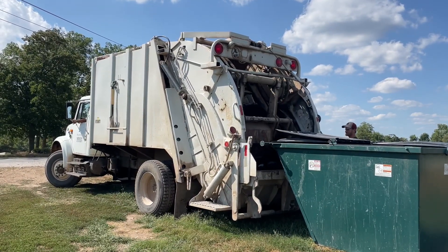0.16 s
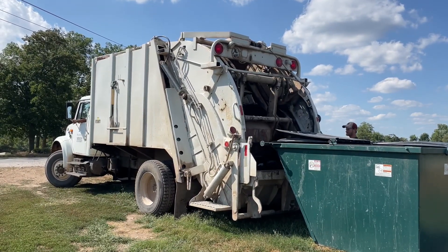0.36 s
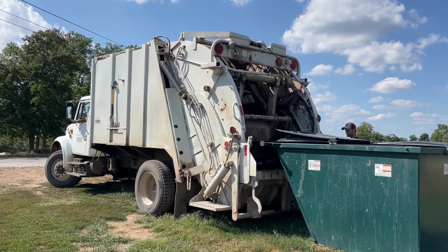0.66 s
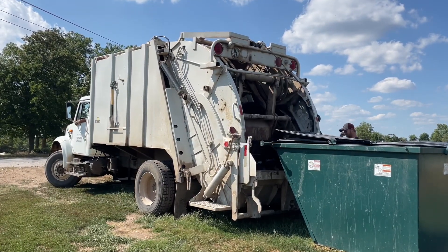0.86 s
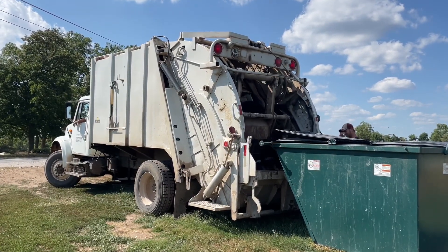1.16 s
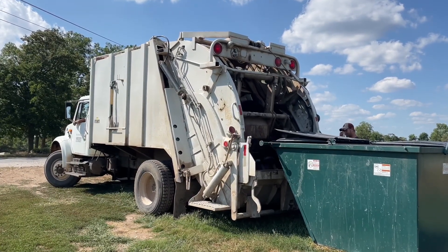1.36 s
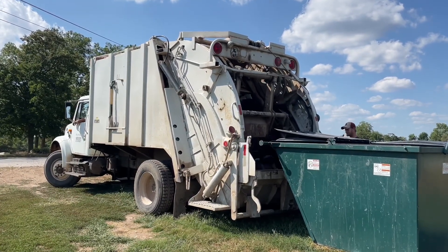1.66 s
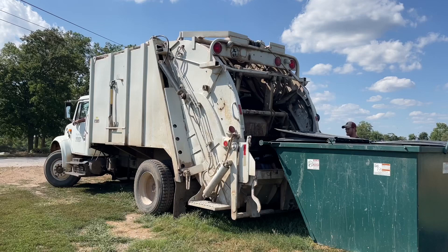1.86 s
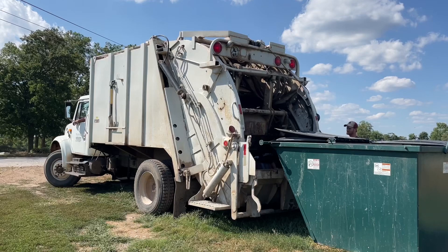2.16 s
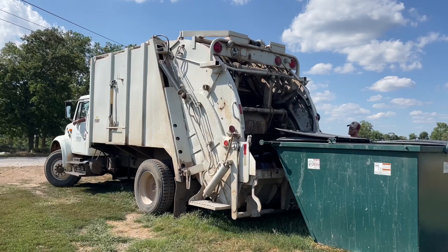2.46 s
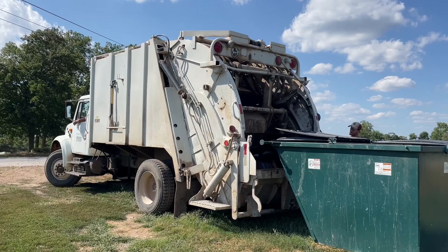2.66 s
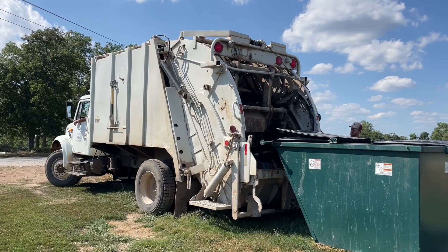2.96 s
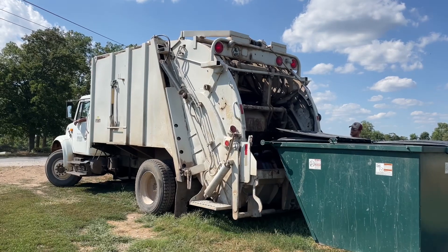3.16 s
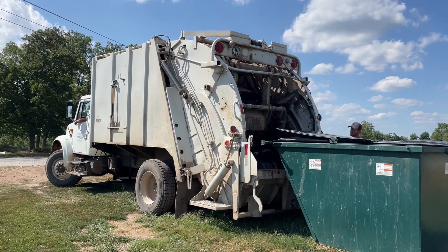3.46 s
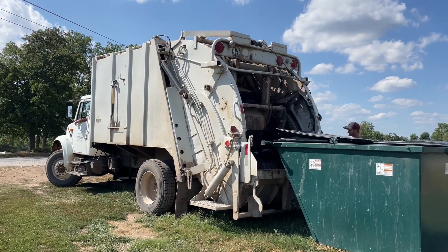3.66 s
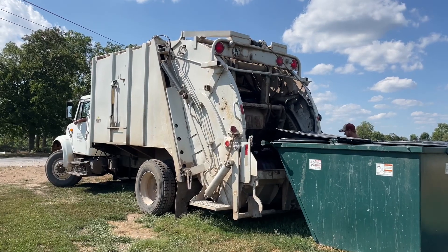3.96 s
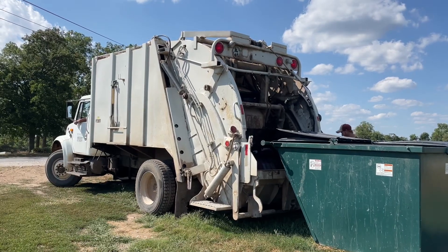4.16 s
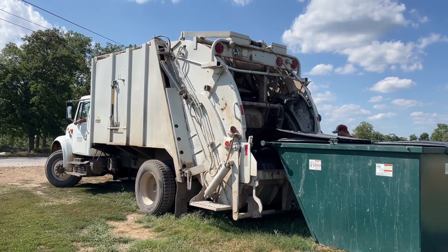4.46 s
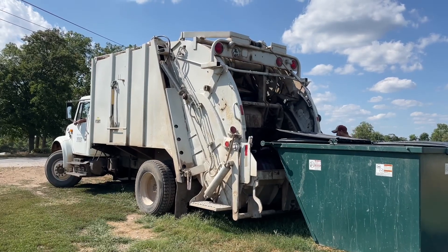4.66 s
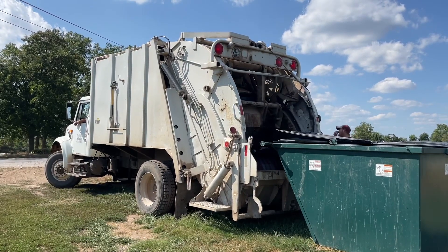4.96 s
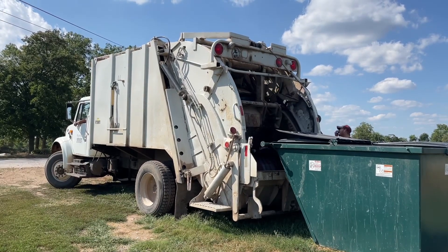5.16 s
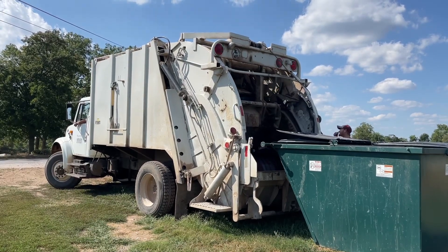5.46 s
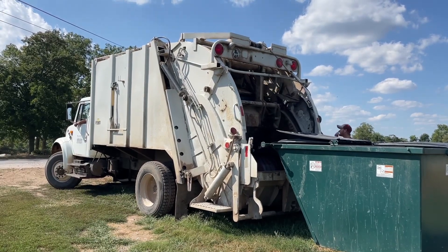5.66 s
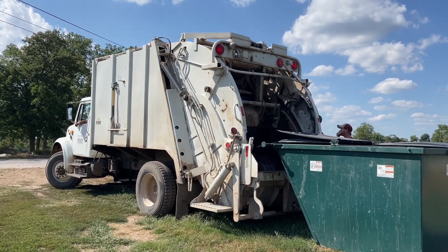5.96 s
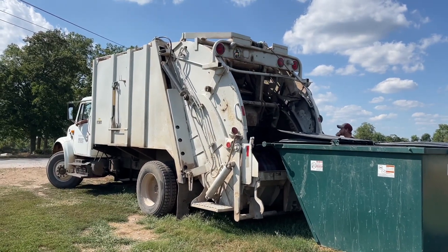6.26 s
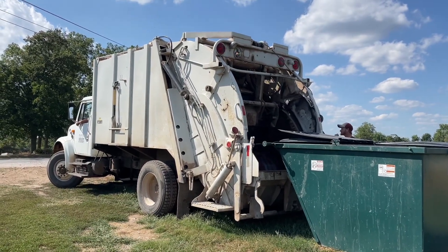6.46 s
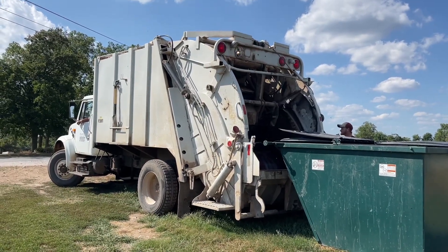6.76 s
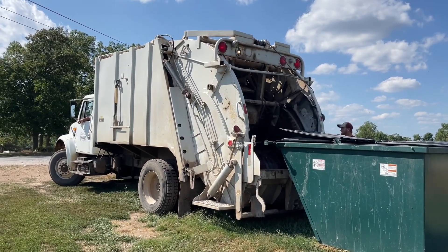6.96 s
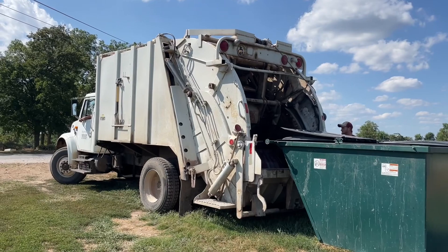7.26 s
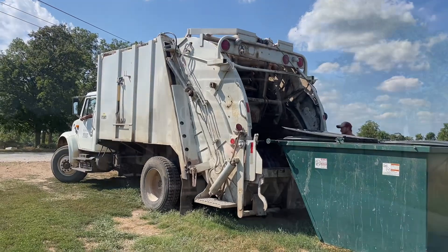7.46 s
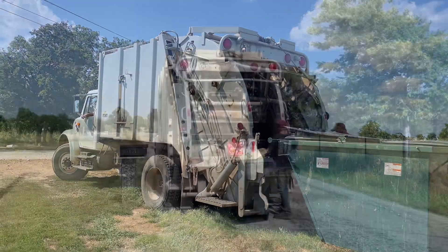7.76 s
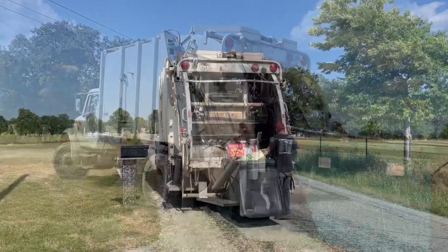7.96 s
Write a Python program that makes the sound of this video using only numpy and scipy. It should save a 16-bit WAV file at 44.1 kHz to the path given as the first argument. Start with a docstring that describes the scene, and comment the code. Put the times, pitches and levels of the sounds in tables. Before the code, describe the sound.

Outdoors near a garbage truck, a diesel at fast, steady idle carries a heavy low hydraulic drone, exhaust rumble, dry mechanical clatter and a thin gear whine around 1500 Hz. Wind buffets the microphone in lumps, with a strong pop at 0.55 s. Small bright snaps and a crunch come near 1.6 s, another snap at 2.4. From 3.4 to 3.9 s trash cracks, scrapes and gives short high squeaks; oil hiss and a gear overtone then slowly rise. At 5.6-5.9 s a dense run of crunches, hollow booms and lower squeaks breaks out and the drone sags. At 6.55 s a very loud hard steel clank hits, with quick rebounds, chatter and a short grind, its ring smothered quickly; the mix ducks and recovers. The engine dips near 6.95 s, then returns. Stronger wind thumps crowd 7.3-7.9 s as the sound begins fading.

```python
"""A rear-loading garbage truck at raised idle: its diesel drives a droning hydraulic pump through whining gears.
Tones follow the shaft; shaped noise makes the clatter, the exhaust rumble and the hiss of oil in the valve.
The packer blade squeaks and crushes trash, dragging the engine down, then hits its stop with a steel clank
built from decaying modes. Noise gusts and falling pops are wind on the microphone.
A limiter ducks after peaks such as the clank, and the sound fades at the end."""
import sys
import numpy as np
from scipy import signal
from scipy.fft import rfft, irfft, next_fast_len
from scipy.io import wavfile
from scipy.ndimage import uniform_filter1d, minimum_filter1d, map_coordinates

SR = 44100
rng = np.random.default_rng(int(sys.argv[2]) if len(sys.argv) > 2 else 0)


def waveform_to_disk(signal):
    """Save audio, clipped to [-1, 1], as 16-bit WAV at the path in sys.argv[1]."""
    frames = np.transpose(np.atleast_2d(signal))
    scaled = np.clip(frames, -1, 1) * 32767
    samples = np.round(scaled).astype(np.int16)
    wavfile.write(sys.argv[1], SR, samples)


N = 357210

# All colour tables give relative density: their noise is scaled to rms 1 before it gets its level.

# speed of the drive, before a slight drift: (time [s], gear mesh pitch [Hz])
MESH_SPEED = [(0.0, 1498), (1.82, 1508), (5.47, 1510), (6.95, 1471), (7.11, 1506), (7.4, 1492),
              (8.05, 1492)]
# level of the pump drone, which sags while the trash gives way: (time [s], level [dB])
PUMP_DRONE = [(5.45, -17.5), (5.72, -22), (5.97, -20), (6.35, -14.5), (6.6, -17.5)]
# sidebands of the gear mesh and high pump and engine orders at idle: (pitch [Hz], level [dB])
WEAKER_WHINES = [(683.7, -46.5), (866.7, -45.5), (936.7, -41), (963.6, -56), (1416, -52), (1669, -46.5),
                 (1739, -44), (1965, -51.5), (2099, -49), (2196, -50.5), (2444, -53), (2509, -46.5),
                 (2740, -48.5), (3246, -49)]
# colour of the engine clatter: (frequency [Hz], density [dB per Hz])
CLATTER_COLOUR = [(300, -30), (520, -5), (700, -5), (950, -2.5), (1500, -4), (1950, -8.5), (2600, -7),
                  (3500, -14), (4600, -19), (5600, -24), (7000, -28.5), (9000, -32.5), (13000, -35.5),
                  (15500, -50)]
# panels and cavities that colour the clatter: (frequency [Hz], width [Hz], gain [dB])
BODY_PANELS = [(606, 170, -1.5), (860, 240, 4.5), (1201, 110, -12), (1400, 700, 1.5), (1890, 69, -3.5),
               (2480, 120, 0), (2890, 110, -7), (3390, 130, -7.5), (4430, 370, 6), (6180, 130, 6.5)]
# colour of exhaust and body rumble: (frequency [Hz], density [dB per Hz])
RUMBLE_COLOUR = [(25, -32), (46, -9), (68, 7), (110, -6.5), (200, -2.5), (280, -12.5), (370, -4.5),
                 (450, -15), (540, -33), (900, -66)]
# strokes of the packer ram:
# (start [s], length [s], pressure build-up [s], oil hiss level [dB], gear overtone level [dB])
RAM_STROKES = [(3.6, 3.22, 2.87, -51.5, -41), (6.882, 1.3, 0.31, -45, -48.5)]
# colour of the oil hiss: (frequency [Hz], density [dB per Hz])
OIL_COLOUR = [(1500, -34.5), (3000, 5), (3600, 1), (4500, -4), (6000, -14), (9000, -3), (11500, -6),
              (15000, -19.5)]
# trash breaking under the blade: (time [s], crack level [dB], hopper boom level [dB], pitch [Hz])
CRUNCHES = [(1.5931, -23.5, -31, 1474), (3.419, -20.5, -34.5, 2400), (3.433, -20.5, -26.5, 2100),
            (3.622, -27, -30, 1600), (5.58, -20.5, -15, 2760), (5.5984, -25.5, -22, 1110),
            (5.7165, -19, -27, 2000), (5.791, -20.5, -20, 1735), (5.801, -17, -18.5, 1505),
            (5.808, -14.5, -18.5, 3420), (5.827, -22.5, -24, 1900), (5.895, -21, -17.5, 1634)]
# colour of splintering trash: (frequency [Hz], density [dB per Hz])
SPLINTER_COLOUR = [(700, -15), (1400, 7.5), (2400, 2), (3500, 3.5), (5000, -11.5), (7000, -12.5),
                   (15000, -31.5)]
# colour of the hopper boom: (frequency [Hz], density [dB per Hz])
HOPPER_COLOUR = [(150, -25.5), (330, 12.5), (450, 9.5), (650, -7), (1000, 4), (1300, -26), (2500, -63.5)]
# trash dragged over the hopper floor: (start [s], length [s], level [dB])
FLOOR_DRAGS = [(3.42, 0.04, -31.5), (3.577, 0.17, -31), (3.725, 0.025, -33), (5.558, 0.4, -32.5),
               (6.845, 0.088, -28)]
# colour of the scrape: (frequency [Hz], density [dB per Hz])
SCRAPE_COLOUR = [(200, -12.5), (380, 6.5), (600, -0.5), (850, 10.5), (1150, -2.5), (1550, 3), (2300, -7),
                 (4000, -23.5), (15000, -48)]
# the clearest small bright snaps: (time [s], level [dB])
CLEAR_SNAPS = [(1.5772, -32.5), (1.598, -29.5), (1.7505, -37), (1.779, -35), (2.0038, -34.5), (2.127, -35),
               (2.41, -27), (3.141, -35), (3.29, -36), (3.426, -27), (4.667, -27.5), (4.7405, -32),
               (4.76, -37), (5.812, -32.5), (6.2626, -25.5), (6.4572, -33.5), (6.708, -24.5)]
# colour of the snaps: (frequency [Hz], density [dB per Hz])
SNAP_COLOUR = [(700, -2.5), (1500, 7), (3500, 10), (6500, 0), (11000, 0), (15000, -9)]
# rubbing squeaks: (time [s], length [s], pitch [Hz], level [dB], roughness [0-1])
RUBBING_SQUEAKS = [(3.33, 0.017, 3340, -30, 0.4), (3.689, 0.023, 3600, -24, 0.4),
                   (3.711, 0.025, 3630, -24, 0.1), (3.733, 0.027, 3510, -22, .15),
                   (3.736, 0.015, 5050, -32.5, .3), (3.749, 0.051, 3490, -34.5, 0.5),
                   (3.917, 0.037, 3510, -26, 0.7), (4.556, 0.02, 4100, -31.5, 1),
                   (5.63, 0.022, 1366, -24, .4), (5.717, 0.016, 974, -11.5, .1),
                   (5.715, 0.015, 1370, -16, 0), (5.739, 0.022, 1000, -25, .7),
                   (5.768, 0.024, 1015, -16, .2)]
# the blade's hit and rebounds:
# (time [s], ring level [dB], crack level [dB], frequency that the contact wakes most [Hz])
BLADE_HITS = [(6.552, 0, -1.5, 2390), (6.627, -14.5, -33, 1000), (6.666, -17, -21.5, 2900),
              (6.7, -24, -17.5, 4200)]
# ringing modes of the blade's stop: (frequency [Hz], level [dB], 60 dB decay [s])
STOP_MODES = [(1255, -15, 0.28), (1365, -7.5, 0.33), (1625, 4, 0.12), (1650, -9, 0.28), (2244, -4, 0.28),
              (2696, -11.5, 0.15), (2970, -12.5, 0.064), (3244, -3, 0.075), (3420, -7.5, 0.11),
              (3590, -13, 0.25), (4200, -8, 0.11), (4590, 1, 0.038), (4780, -8.5, 0.11)]
# colour of the hard crack: (frequency [Hz], density [dB per Hz])
CRACK_COLOUR = [(500, -9), (1000, -9.5), (1400, -1.5), (2500, -8), (4200, -9.5), (5500, -14), (8000, -12.5),
                (10500, -17), (15000, -33.5)]
# the blade grinds into its seat and pulls free again: (start [s], length [s], level [dB])
SEAT_GRINDS = [(6.698, 0.019, -22), (6.848, 0.087, -28)]
# gusts on the microphone: (start [s], length [s], buffet level [dB])
WIND_GUSTS = [(-0.1, 0.17, -24), (0.33, 0.33, -22.5), (1.4, 0.86, -28.5), (2.05, 1.13, -22.5),
              (3.1, 0.54, -20), (4.4, 1, -24.5), (5.52, 0.98, -17), (6.83, 0.17, -12.5), (7.28, 0.41, -13),
              (7.75, 0.74, -13)]
# colour of the buffeting: (frequency [Hz], density [dB per Hz])
BUFFET_COLOUR = [(20, -35), (35, -13), (55, 0), (100, -2.5), (180, -8), (350, -16), (550, -30.5),
                 (1000, -37), (3000, -95)]
# big eddies that pop on the microphone: (time [s], peak level [dB], middle pitch [Hz])
BIG_THUMPS = [(0.5529, -4, 404), (2.256, -10.5, 128), (3.208, -11.5, 338), (3.457, -13, 326),
              (3.554, -9.5, 288), (3.593, -7, 212), (5.179, -11, 275), (5.69, -9.5, 242), (5.864, -10, 300),
              (6.038, -16.5, 367), (6.082, -19, 380), (6.199, -5.5, 151), (6.227, -9.5, 292),
              (6.384, -8.5, 310), (6.438, -13, 454), (6.486, -12, 171), (6.955, -8, 232), (7.417, -9, 152),
              (7.461, -11, 290), (7.501, -7, 297), (7.625, -5, 310), (7.639, -8, 670), (7.676, -14, 202),
              (7.879, -11, 273)]
# tonal tilt between the channels: (frequency [Hz], left minus right [dB])
STEREO_LEAN = [(60, -1.5), (110, 1), (200, -1.5), (380, 0), (700, 4), (1300, -0.2), (2400, -0.6),
               (8000, -0.5)]
# lead of the left channel for a source at the truck's side: (frequency [Hz], phase [radians])
STEREO_LEAD = [(60, 0.35), (300, 0.41), (900, 0.86), (1100, 1.95), (1300, 0.79), (1500, 0.41), (1800, 1.6),
               (2100, 1.22), (3150, 2.56), (4200, 1.73), (5000, 0.76)]
# phase of left against right that the microphone pair adds in the treble: (frequency [Hz], phase [radians])
TREBLE_TWIST = [(5000, 0), (5800, -1.6), (6500, -.7), (7700, -3.4), (9200, -3.8), (12500, -6.7)]
# gain of the scattered sound: (frequency [Hz], scattered minus direct [dB])
SCATTER = [(60, -15), (220, -20.5), (600, -10), (1500, -29.5), (2500, -5.5), (3700, -6), (5300, -10.5),
           (6200, -2), (8500, -26), (11000, -18), (12800, -27.5)]

GEAR_TEETH, PUMP_RATIO, FAN_RATIO, IDLE_MESH_HZ = 68, 6.614, 8.09, 1508.3
FIRING_DB, FAN_DB, MESH_DB, CLATTER_DB, RUMBLE_DB = -19.5, -32.5, -35, -32, -25.5
# change at full pressure; for the whine, per octave above the knee
LOADED_CLATTER_DB, LOADED_WHINE_DB, WHINE_KNEE_HZ = -1, -11, 1000
VENT_S, HISS_POWER = 0.14, 3.6  # the pressure falls in this time; hiss grows as this power of it
IDLE_HISS_DB, IDLE_OVERTONE_DB = -68.5, -63.5
CRUNCH_T60_S, BOOM_T60_S = 0.087, 0.24
CRUNCH_RISE_S, HARD_CRUNCH_DB = 0.0011, -16  # rise time of a crack at this level
WALL_RING_DB, WALL_T60_S = -16, 0.13  # each mode of the hopper wall, relative to the crack that wakes it
DRAG_RISE_S, DRAG_FALL_S, CRUMPLE_DB = 0.025, 0.09, -9.5  # crumpling is relative to the drag
# loose scrap; its level is relative to the drag, its ticks to the knock
RATTLES_PER_S, RATTLE_DB, RATTLE_HZ, RATTLE_T60_S, RATTLE_TICK_DB = 70, 3.5, 1253, 0.06, -11.5
SNAP_T60_S, FAINT_SNAPS_PER_S, FAINT_SNAP_DB = 0.049, 14, -44.5
SNAP_TAIL_DB, SNAP_TAIL_T60_S = -15.5, 0.44  # the bits settle after each clear snap; relative to it
SQUEAK_WIDTH = 0.033  # half width of a rough slip's band, as a share of its pitch
CONTACT_DB_PER_OCTAVE = 5.5  # modes away from a contact's own pitch are woken less
PLATE_DB, PLATE_T60_S = -16.5, 0.12  # the crowd of short plate modes, relative to the crack colour
SEATED_S, SEATING_S, SEATED_DB = 6.672, 0.03, 8  # when the blade seats, how long it takes, its damping
CHATTER_HZ, CHATTER_DB = 66, 3  # rate and depth of the blade's chatter
BUZZ_DB, BUZZ_PER_S = 1.5, 260  # loose parts touch the ringing steel and roughen it
GRIND_RISE_S, GRIND_FALL_S = 0.011, 0.033
GUST_RISE_S, GUST_FALL_S, CALM_DB = 0.12, 0.15, -37.5
THUMP_CYCLES, THUMP_SAG = 3.26, 5.94  # length of a pop; its first pitch over its last
SMALL_THUMPS_PER_S, SMALL_THUMP_DB, SMALL_THUMP_HZ = 28, -3.5, 329  # strongest, relative to the gust
CEILING, TOP_HZ = .9, 15700  # limiter ceiling [full scale]; upper band edge
FADE_START_S, FADE_DB_PER_S = 7.38, 9


def drive():
    """A six-cylinder diesel fires three times a turn; gears, pump and fan follow its shaft."""
    mesh = np.cumsum(curves(MESH_SPEED)[0] * (1 + 0.00031 * wobble(8))) / SR  # cycles so far
    firing = mesh * 3 / GEAR_TEETH
    pump = mesh / PUMP_RATIO
    fan = mesh / FAN_RATIO

    def tone(cycles, db, waver_db):
        """Sine of a given rms level that wavers slowly."""
        level = amp(db + waver_db * wobble(9))
        return np.sqrt(2) * level * np.sin(2 * np.pi * (cycles + rng.random()))

    hum = tone(firing, FIRING_DB, 0.27) + tone(fan, FAN_DB, 2.3)
    hum += tone(pump, curves(PUMP_DRONE)[0], 0.094) + tone(2 * pump, -48.5, 1.1)

    # oil pressure holds the gear teeth together: they rattle less and their overtone comes out
    pressure = sum(swell(s, length, build, VENT_S) for s, length, build, _, _ in RAM_STROKES)
    strain = sum(amp(db) * swell(s, length, build, VENT_S) for s, length, build, _, db in RAM_STROKES)

    # the strongest whine is steady, the weaker ones waver in the moving air
    whine = tone(mesh, MESH_DB, 0.65)
    whine += (amp(IDLE_OVERTONE_DB) + strain) * tone(2 * mesh, 0, 1.9)
    for hz, db in WEAKER_WHINES:
        octaves_above = max(np.log2(hz / WHINE_KNEE_HZ), 0)
        whine += tone(mesh * hz / IDLE_MESH_HZ, db + LOADED_WHINE_DB * pressure * octaves_above, 2.8)

    # part of the clatter repeats with every engine cycle, the rest is always new
    cycle = firing / 6
    pattern = rng.standard_normal(4096)
    repeating = unit(map_coordinates(pattern, [cycle % 1 * len(pattern)], mode="grid-wrap"))
    knocking = rng.standard_normal((2, N)) + 0.5 * np.array([repeating, np.roll(repeating, SR // 2)])
    pulse_db = .5 * np.cos(2 * np.pi * firing) + .5 * np.cos(4 * np.pi * firing)
    pulse_db += 0.64 * np.cos(2 * np.pi * pump) + wobble(8.0) / 2

    def body(hz):
        """Response of the clatter through panels and cavities."""
        panels = sum(db * np.exp(-2 * ((hz - f) / width) ** 2) for f, width, db in BODY_PANELS)
        return amp(along(CLATTER_COLOUR, hz) + panels)

    clatter = amp(CLATTER_DB + LOADED_CLATTER_DB * pressure) * unit(filtered(knocking * amp(pulse_db), body))
    engine_noise = clatter + amp(RUMBLE_DB) * noise(RUMBLE_COLOUR)
    return placed(hum + whine + engine_noise[0], engine_noise[1], bearing=0.91)


def oil():
    """Oil hisses through the control valve as the pressure of each stroke rises."""
    flow = sum(amp(db) * swell(s, length, build, VENT_S) ** HISS_POWER
               for s, length, build, db, _ in RAM_STROKES)
    hiss = (amp(IDLE_HISS_DB) + flow) * amp(3.7 * wobble(37)) * noise(OIL_COLOUR)
    return placed(*hiss, bearing=0.96)


def clank():
    """The blade hits its stop with a hard crack and a ring, then chatters and grinds into its seat."""
    ring, t = np.zeros((2, N)), np.arange(N) / SR
    plate = [(hz, along(CRACK_COLOUR, hz) + PLATE_DB, PLATE_T60_S)
             for hz in rng.uniform(1200, 12000, size=36)]
    for s, db, crack_db, centre in BLADE_HITS:
        # every contact lands on another spot and wakes its own part of the modes
        modes = [(hz, level - CONTACT_DB_PER_OCTAVE * abs(np.log2(hz / centre)), t60)
                 for hz, level, t60 in STOP_MODES]
        add(ring, s, amp(db) * ringing(modes, attack=0.0032))
        add(ring, s, amp(crack_db) * ringing(plate, attack=0.001))
    blows = bursts([(s, db) for s, _, db, _ in BLADE_HITS], attack=0.0028, t60=0.086)
    crack = blows * np.tanh(noise(CRACK_COLOUR) / 2) * 2  # softly clipped

    # after the rebound the blade chatters against the stop and chops the ring
    rebounded = t > BLADE_HITS[1][0]
    chatter = amp(CHATTER_DB * rebounded * np.cos(2 * np.pi * CHATTER_HZ * t + wobble(40) / 2))
    # once the blade is seated it presses on the steel and smothers the ring
    seated = amp(-SEATED_DB * np.clip((t - SEATED_S) / SEATING_S, 0, 1))
    buzz = unit(amp(BUZZ_DB * wobble(BUZZ_PER_S)))

    grit = unit(amp(2.5 * wobble(300) + 2.6 * wobble(70)) * noise(CRACK_COLOUR))
    grind = swells(SEAT_GRINDS, GRIND_RISE_S, GRIND_FALL_S) * grit
    return placed(*(ring * buzz * chatter * seated + crack + grind), bearing=0.1)


def trash():
    """Trash scrapes and rattles along, breaks and booms in the hopper; small bits snap, faint ones at random."""
    grain = unit(amp(1.2 * wobble(450)))
    boom = bursts([(s, db) for s, _, db, _ in CRUNCHES], attack=0.0017, t60=BOOM_T60_S) * noise(HOPPER_COLOUR)

    rubbing = amp(5.6 * wobble(60)) * grain * noise(SCRAPE_COLOUR)
    crumpling = amp(CRUMPLE_DB) * unit(amp(6.7 * wobble(250)) * noise(SPLINTER_COLOUR))
    scrape = swells(FLOOR_DRAGS, DRAG_RISE_S, DRAG_FALL_S) * (rubbing + crumpling)

    chances = rng.random((256, 2))[:int(FAINT_SNAPS_PER_S * N / SR)]
    faint = [(when * N / SR, FAINT_SNAP_DB - 6 * weak) for when, weak in chances]
    knocks = jostles()
    ticks = [(s, db + RATTLE_TICK_DB) for s, db, _ in knocks]
    snapping = bursts(list(CLEAR_SNAPS) + faint + ticks, attack=0.00036, t60=SNAP_T60_S)
    settling = amp(SNAP_TAIL_DB) * bursts(CLEAR_SNAPS, attack=SNAP_T60_S / 10, t60=SNAP_TAIL_T60_S)
    snaps = (snapping + settling) * grain * noise(SNAP_COLOUR)
    return placed(*(crunches() + boom + scrape + rattle(knocks) + snaps), bearing=0.7)


def crunches():
    """Every piece that breaks crackles at its own pitch and rings its own patch of the steel hopper wall."""
    track, t = np.zeros((2, N)), np.arange(SR // 3) / SR
    for s, db, _, pitch in CRUNCHES:
        knots = np.arange(0, SR / 2, 170)
        ripple_db = 4 * rng.standard_normal(len(knots))

        def colour(hz):
            """Splinter colour with a random ripple and a peak at the piece's pitch."""
            peak_db = 5 * np.exp(-(3 * np.log((hz + 1) / pitch)) ** 2)
            return amp(along(SPLINTER_COLOUR, hz) + np.interp(hz, knots, ripple_db) + peak_db)

        grains = rng.standard_normal((2, len(t))) * amp(1.2 * wobble(620, size=len(t)))
        rise = CRUNCH_RISE_S * amp(HARD_CRUNCH_DB - db)  # weak pieces give way slowly
        envelope = np.exp(-np.log(1000) * t / CRUNCH_T60_S) * (1 - np.exp(-t / rise))
        add(track, s, amp(db) * unit(filtered(grains, colour)) * envelope)
        wall_hz = pitch * 2 ** rng.uniform(-.5, .5, size=5)
        wall = [(hz, db + WALL_RING_DB, WALL_T60_S) for hz in wall_hz]
        add(track, s, ringing(wall, attack=rise))
    return track


def jostles():
    """Loose scrap knocks at random for as long as it is dragged: (time [s], level [dB], pitch [Hz])."""
    hits = []
    for s, length, db in FLOOR_DRAGS:
        chances = rng.random((128, 3))[:int(RATTLES_PER_S * length)]
        hits += [(s + when * length + DRAG_RISE_S / 2, db - 10 * weak, RATTLE_HZ * 2 ** (2 * high - 1))
                 for when, weak, high in chances]
    return hits


def rattle(hits):
    """Each knock rings one piece of thin metal briefly."""
    track, t = np.zeros((2, N)), np.arange(SR // 10) / SR
    for s, db, hz in hits:
        phase = 2 * np.pi * hz * t
        decay = np.exp(-np.log(1000) * t / RATTLE_T60_S)
        add(track, s, amp(db + RATTLE_DB) * decay * np.array([np.sin(phase), np.cos(phase)]))
    return track


def squeaks():
    """Stick and slip under the blade sings at unsteady pitches; a rough slip frays into a narrow rasp."""
    track = np.zeros(N)
    for s, length, hz, db, rough in RUBBING_SQUEAKS:
        size, share = int(length * SR), np.clip(rough, 0, 1)
        phase = 2 * np.pi * np.cumsum(hz * (1 + .01 * wobble(600, size=size))) / SR
        band = lambda f: 1 / (1 + ((f / hz - 1) / SQUEAK_WIDTH) ** 2)
        rasp = unit(filtered(rng.standard_normal(SR // 10), band)[:size])
        song = np.sqrt(1 - share) * np.sin(phase) + np.sqrt(share / 2) * rasp
        add(track, s, amp(db) * np.sqrt(np.hanning(size)) * song)
    return placed(track, np.roll(track, SR // 200), bearing=0.67)


def wind():
    """Eddies strike the microphone in lumps; strong ones overload it softly."""
    buffet = gusts() * unit(amp(3.1 * wobble(22)) * noise(BUFFET_COLOUR))
    overload = 0.41  # full scale
    return spread(overload * np.tanh(buffet / overload), side_db=-8.0)


def thumps():
    """Eddies pop on the microphone, falling in pitch within a few cycles; gusts bring small ones at random."""
    track, strength = np.zeros(N), gusts()
    small = []
    for when, weak, high in rng.random((512, 3))[:int(SMALL_THUMPS_PER_S * N / SR)]:
        gust_db = 20 * np.log10(strength[int(when * N)])
        hz = SMALL_THUMP_HZ * 2 ** (high - .5)
        small.append((when * (N - 1) / SR, gust_db + SMALL_THUMP_DB - 10 * weak, hz))
    for s, db, hz in list(BIG_THUMPS) + small:
        size = int(THUMP_CYCLES / hz * SR)
        pitch = hz * THUMP_SAG ** np.linspace(.5, -.5, size)
        add(track, s, amp(db) * np.hanning(size) * np.sin(2 * np.pi * np.cumsum(pitch) / SR))
    return track


def gusts():
    """Strength of the wind: gusts rise out of a light breeze."""
    return amp(CALM_DB) + swells(WIND_GUSTS, GUST_RISE_S, GUST_FALL_S)


def ringing(modes, attack):
    """One blow on steel: modes (frequency [Hz], level [dB], t60 [s]) build up and die away, slightly unsteady."""
    t = np.arange(SR // 3) / SR
    total = np.zeros((2, len(t)))
    for hz, db, t60 in modes:
        phase = 2 * np.pi * (hz * t + rng.random((2, 1))) + .55 * wobble(150, size=len(t))
        total += amp(db) * np.exp(-np.log(1000) * t / t60) * np.sin(phase)
    return (1 - np.exp(-t / attack)) * total


def bursts(rows, attack, t60):
    """Envelope of blows (time [s], level [dB]) that rise fast and die away."""
    track, t = np.zeros(N), np.arange(SR // 2) / SR
    shape = np.exp(-np.log(1000) * t / t60) * (1 - np.exp(-t / attack))
    for s, db in rows:
        add(track, s, amp(db) * shape)
    return track


def swell(start, length, rise, fall):
    """Envelope from 0 to 1: it rises, holds until its length is over, then falls."""
    t = np.arange(N) / SR - start
    return np.clip(np.minimum(t / rise, 1 - (t - length) / fall), 0, 1)


def swells(rows, rise, fall):
    """Envelope of swells (start [s], length [s], level [dB]) that share their rise and fall."""
    return sum(amp(db) * swell(s, length, rise, fall) for s, length, db in rows)


def placed(direct, scattered, bearing):
    """Stereo for a source to the left (bearing 1) or ahead (0); scattered sound is opposite in the channels."""
    sign = np.array([[1], [-1]])
    pair = direct + sign * filtered(scattered, lambda hz: amp(along(SCATTER, hz)))

    def channels(hz):
        """Level and phase of left and right, half of the difference on each."""
        phase = bearing * along(STEREO_LEAD, hz) + along(TREBLE_TWIST, hz)
        return amp(sign * along(STEREO_LEAN, hz) / 2) * np.exp(.5j * sign * phase)

    return filtered(pair, channels)


def spread(pair, side_db):
    """Stereo from a middle signal and a weaker unrelated side signal."""
    return pair[0] + amp(side_db) * pair[1] * np.array([[1], [-1]])


def noise(spectrum):
    """Two unrelated coloured noises, scaled together to rms 1."""
    return unit(filtered(rng.standard_normal((2, N)), lambda hz: amp(along(spectrum, hz))))


def filtered(x, response):
    """x times a response of frequency."""
    n = x.shape[-1]
    m = next_fast_len(n + 8192)  # padding keeps the tail from wrapping round
    return irfft(rfft(x, m) * response(np.fft.rfftfreq(m, 1 / SR)), m)[..., :n]


def wobble(rate, size=N):
    """A smooth random curve, rate knots a second."""
    knots = rng.standard_normal(int(size * rate / SR) + 4)
    grid = np.arange(0, len(knots) - 1, 1 / 6)
    smooth = map_coordinates(knots, [grid])
    return np.interp(np.arange(size) * (rate / SR), grid, smooth)


def curves(rows):
    """One value per sample for each column after the time."""
    s, *cols = np.transpose(rows)
    return [np.interp(np.arange(N) / SR, s, c) for c in cols]


def along(points, hz):
    """(frequency [Hz], value) points read on a log axis."""
    f, v = np.transpose(points)
    return np.interp(np.log(hz + 1), np.log(f + 1), v)


def add(track, s, sound):
    """Mix a sound into a track at time s."""
    part = track[..., round(s * SR):][..., :sound.shape[-1]]
    part += sound[..., :part.shape[-1]]


def amp(db):
    """Decibels to gain."""
    return 10 ** (np.asarray(db) / 20)


def unit(x):
    """Scale to rms 1."""
    return x / np.sqrt(np.mean(x ** 2) + 1e-20)


def scene():
    """Truck, load and wind together."""
    return drive() + oil() + clank() + trash() + squeaks() + wind() + thumps()


def limiter(x, ceiling, hold, release):
    """Peaks pull the gain down at once; it holds, then recovers."""
    need = np.minimum(1, ceiling / (np.abs(x).max(axis=0) + 1e-9))
    h, r = int(hold * SR / 2), int(release * SR / 2)
    # the shifted windows look back in time only
    held = minimum_filter1d(need, 2 * h + 1, origin=h, mode="nearest")
    recovering = np.exp(uniform_filter1d(np.log(held), 2 * r + 1, origin=r, mode="nearest"))
    gain = minimum_filter1d(np.minimum(held, recovering), size=64)
    return x * uniform_filter1d(gain, size=64)


def record(dry):
    """Limiter, closing fade and band limit."""
    fade_db = -FADE_DB_PER_S * np.maximum(np.arange(N) / SR - FADE_START_S, 0)
    out = limiter(dry, ceiling=CEILING, hold=0.17, release=0.31) * amp(fade_db)
    return filtered(out, lambda hz: hz < TOP_HZ)


dry = scene()
out = record(dry)
waveform_to_disk(out)
```